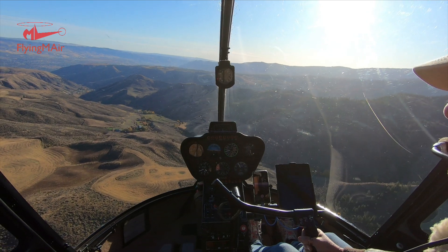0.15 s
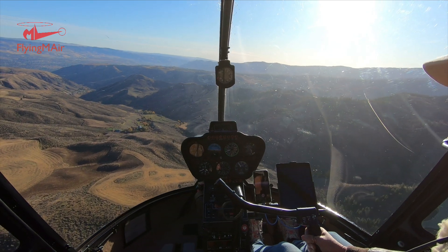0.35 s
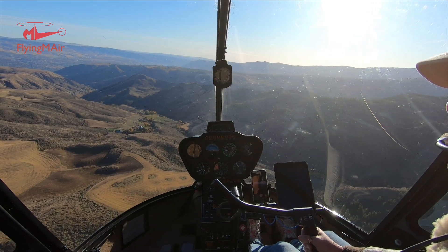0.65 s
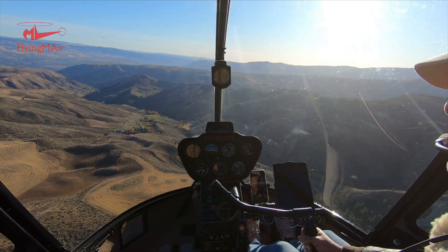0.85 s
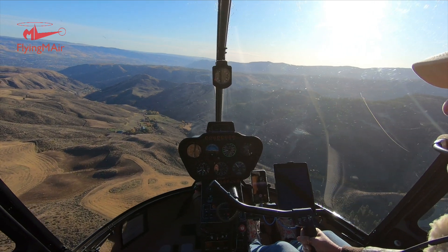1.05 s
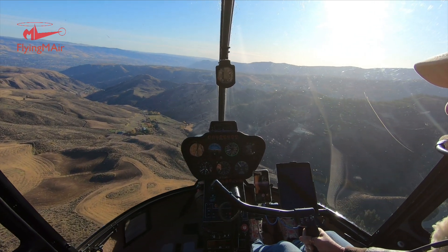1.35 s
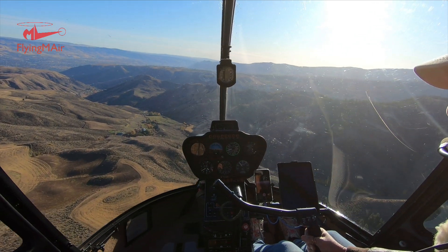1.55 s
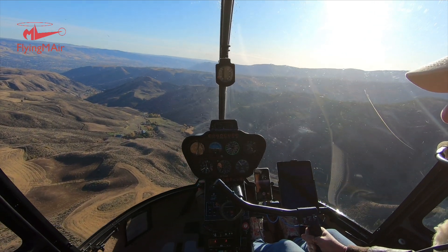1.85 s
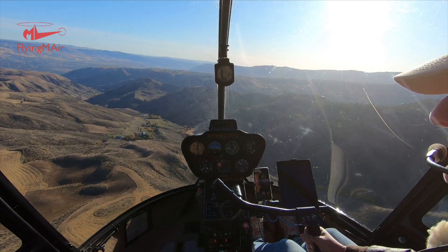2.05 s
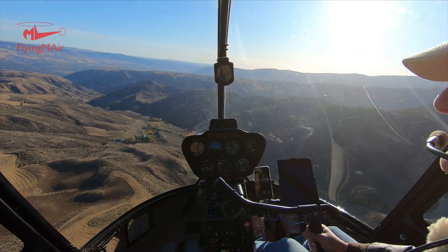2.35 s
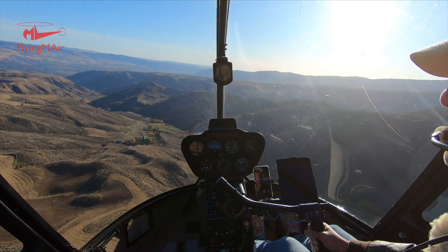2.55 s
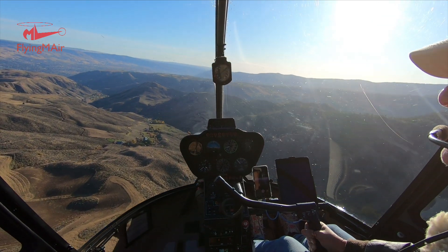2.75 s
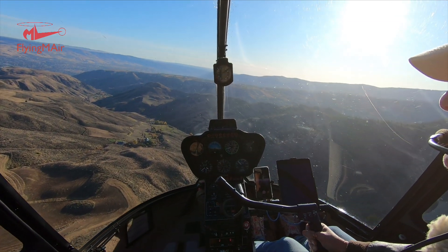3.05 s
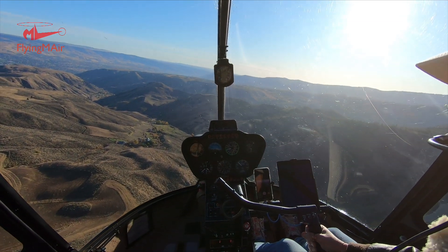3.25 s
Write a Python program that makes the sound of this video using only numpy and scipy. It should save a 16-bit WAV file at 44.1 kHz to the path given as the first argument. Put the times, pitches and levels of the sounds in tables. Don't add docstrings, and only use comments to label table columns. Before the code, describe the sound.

Helicopter cabin drone: fast rotor thumping over engine hum, air roar and a wavering low vent moan

```python
import sys
import numpy as np
from scipy import signal
from scipy.io import wavfile
from scipy.ndimage import uniform_filter1d

SR = 44100
rng = np.random.default_rng(int(sys.argv[2]) if len(sys.argv) > 2 else 0)


def decibels_to_gain(level_db):
    exponent = np.asarray(level_db, float) / 20
    return 10 ** exponent


def waveform_to_disk(signal):
    frames = np.transpose(np.atleast_2d(signal))
    scaled = np.clip(frames, -1, 1) * 32767
    samples = np.round(scaled).astype(np.int16)
    wavfile.write(sys.argv[1], SR, samples)


N = 149940

# time in seconds, blade passes per second.
ROTOR_SPEED = [
    (0, 13.5),
    (2.2, 13.5),
    (3.0, 13.58),
    (3.4, 13.58),
]
# multiple of the blade rate, rms level in dB.
BLADE_HARMONICS = [(1, -41), (2, -36.5), (3, -40), (4, -42), (5, -46)]
# multiple of the firing rate, rms level in dB.
FIRING_ORDERS = [(1, -43), (2, -41), (3, -47), (4, -55)]
# time in seconds, pitch in Hz, level in dB.
VENT_MOAN = [(0, 169.3, -31), (.25, 167.7, -32.5), (0.401, 147.1, -43), (.62, 173.2, -37),
             (.8, 225.2, -35.5), (0.861, 146.4, -32), (1.2, 132, -32.5), (1.398, 145, -31),
             (1.701, 199.1, -37), (1.902, 135.9, -28.5), (2.151, 115.5, -31.5), (2.32, 115, -31),
             (2.44, 151.9, -29), (2.55, 81.3, -30.5), (2.72, 78.8, -32.5), (2.819, 104.9, -32.5),
             (3.079, 98.3, -32.5), (3.281, 78.65, -33)]
# moment in turns (0-1), spread in ms, pitch in Hz, width in Hz, level in dB.
TRIM_RATTLES = [(.545, 3.6, 8350, 800, -54), (.64, 9, 8000, 900, -63), (.47, 4, 9900, 900, -69),
                (.70, 4, 10000, 900, -71), (.6, 6, 6800, 900, -68), (.67, 1.3, 11900, 1700, -71)]
# frequency in Hz,
# density in dB.
AIR_SPECTRUM = [(20, -12.5), (45, -8), (62, -6), (95, -4.5), (200, -5), (322, -9), (447, -13.5),
                (620, -15), (1000, -18), (1200, -19), (1650, -20.5), (2200, -25), (3000, -26),
                 (3300, -28.5), (4100, -29),
                (4700, -33.5), (5400, -44), (6000, -48), (7300, -46), (8400, -43), (10100, -56.5),
                 (12000, -65), (15700, -72)]
# time in seconds, level in dB.
GUST_LEVEL = [(0.0, -34), (0.2, -35), (0.22, -35), (0.29, -34.5), (1.69, -34), (3.19, -36), (3.23, -34.5),
              (3.4, -35.5)]

THUMP_TURN, THUMP_SKEW_RAD = .777, -2.1
FIRINGS_PER_BLADE = 5.949
VENT_WIDTH_HZ, OVERTONE_RATIO, FUZZ_DB, OVERTONE_DB = 46, 1.83, -7.5, -7.5
WOBBLE_FRACTION, WOBBLE_HZ, THROB_DB = .065, 36, 1.5
TICKS_PER_S = 7000
ROAR_DB, PATCH_DB = -29, 0.31
SWISH_DB, SWISH_TURN, SWISH_FROM_HZ = 1.0, 0.55, 1930
FRAME, HOP = 2048, 256
HISS_DB, OFFSET, KNEE = -95, .0006, .4


def evened(x):
    return x / np.sqrt(np.mean(x ** 2) + 1e-20)


def read_spectrum(points, hz):
    f, value = np.transpose(points)
    return np.interp(np.log(hz + 1), np.log(f + 1), value)


def resonate(x, hz, width_hz):
    carrier = np.exp(2j * np.pi * np.cumsum(hz * np.ones(len(x))) / SR)
    r = np.exp(-np.pi * width_hz / SR)
    low = signal.lfilter([(1 - r) ** 2], [1, -2 * r, r * r], x / carrier)
    return 2 * (carrier * low).real


def drift(rate_hz):
    t = np.arange(N) / SR
    rates_hz = rate_hz * np.geomspace(.1, 1, num=12)
    return evened(sum(np.sin(2 * np.pi * (f * t + rng.random())) / np.sqrt(f) for f in rates_hz))


def blade_turns():
    return np.cumsum(np.interp(np.arange(N) / SR, *np.transpose(ROTOR_SPEED))) / SR


def rotor(turns):
    wave = np.zeros(N)
    for multiple, db in BLADE_HARMONICS:
        phase = 2 * np.pi * round(multiple) * (turns - THUMP_TURN) + THUMP_SKEW_RAD
        wave += decibels_to_gain(db) * np.cos(phase)
    return np.sqrt(2) * wave * decibels_to_gain(0.93 * drift(2.22))


def engine(turns):
    hum = np.zeros(N)
    for multiple, db in FIRING_ORDERS:
        level = decibels_to_gain(db + 0.92 * drift(3))
        cycles = round(multiple) * FIRINGS_PER_BLADE * turns + 0.083 * drift(3.1) + rng.random()
        hum += level * np.cos(2 * np.pi * cycles)
    return np.sqrt(2) * hum


def vent():
    s, pitch_hz, db = np.transpose(VENT_MOAN)
    t = np.arange(N) / SR
    hz = np.interp(t, s, pitch_hz)
    cycles = np.cumsum(hz * (1 + WOBBLE_FRACTION * drift(WOBBLE_HZ))) / SR
    tone = np.sin(2 * np.pi * cycles) * decibels_to_gain(THROB_DB * drift(WOBBLE_HZ))
    fuzz = resonate(rng.standard_normal(N), hz, VENT_WIDTH_HZ)
    upper = resonate(rng.standard_normal(N), OVERTONE_RATIO * hz, 2.08 * VENT_WIDTH_HZ)
    moan = evened(tone) + decibels_to_gain(FUZZ_DB) * evened(fuzz) + decibels_to_gain(OVERTONE_DB) * evened(upper)
    return decibels_to_gain(np.interp(t, s, db)) * moan


def rattles(turns):
    out, blade = np.zeros(N), turns.astype(int)
    for turn, spread_ms, hz, width_hz, db in TRIM_RATTLES:
        late, strong = rng.standard_normal((60, 2)).T
        off_ms = (turns % 1 - turn - 0.017 * late[blade]) * 1000 / ROTOR_SPEED[0][1]
        gate = np.exp(-.5 * (off_ms / spread_ms) ** 2) * decibels_to_gain(db + 0.65 * strong[blade])
        ticks = rng.standard_normal(N) * (rng.random(N) < TICKS_PER_S / SR)
        ring = resonate(gate * ticks, hz, 2.7 * width_hz)
        ring = resonate(ring, hz, 2.7 * width_hz)
        out += ring / np.sqrt(np.mean(ring ** 2) / np.mean(gate ** 2))
    return out


def roar(turns):
    frames, hz = N // HOP + 9, np.fft.rfftfreq(FRAME, 1 / SR)
    real, imag, patches = rng.standard_normal((frames, len(hz), 3)).T
    patches = uniform_filter1d(patches, size=10, axis=0)
    patches = evened(uniform_filter1d(patches, size=28, axis=1))
    at = np.minimum(np.arange(frames) * HOP, N - 1)
    s, db = np.transpose(GUST_LEVEL)
    gust_db = np.interp(at / SR, s, db - db.mean())
    treble = np.clip(hz / SWISH_FROM_HZ - 1, 0, 1)[:, None]
    swish = np.cos(2 * np.pi * (turns[at] - SWISH_TURN)) * treble
    shape_db = read_spectrum(AIR_SPECTRUM, hz)
    shape_db = shape_db - 40 * (hz < 10)
    z = (real + 1j * imag) * decibels_to_gain(shape_db[:, None] + PATCH_DB * patches + SWISH_DB * swish + gust_db)
    air = signal.istft(z, nperseg=FRAME, noverlap=FRAME - HOP)[1][:N]
    return decibels_to_gain(ROAR_DB) * evened(air)


def scene():
    turns = blade_turns()
    return (rotor(turns) + engine(turns) + vent() + rattles(turns) + roar(turns))[None]


def low_pass(x):
    return signal.sosfilt(signal.butter(12, 15720, fs=SR, output="sos"), x)


def record(dry):
    hiss = decibels_to_gain(HISS_DB) * rng.standard_normal(dry.shape)
    mic = KNEE * np.tanh(dry / KNEE) + OFFSET + hiss
    return low_pass(mic)


dry = scene()
out = record(dry)
waveform_to_disk(out)
```